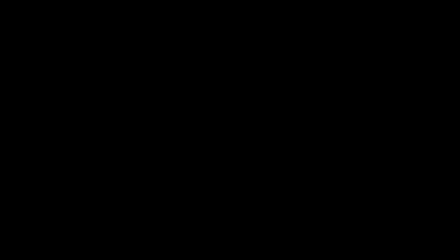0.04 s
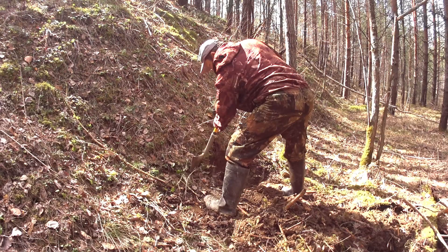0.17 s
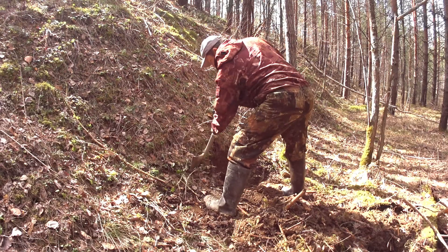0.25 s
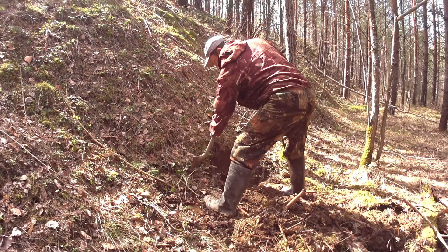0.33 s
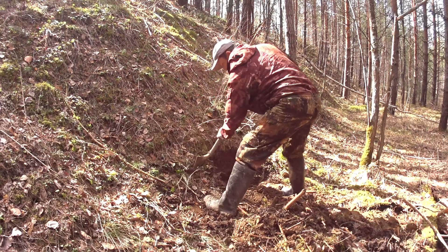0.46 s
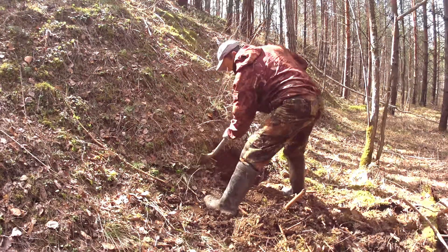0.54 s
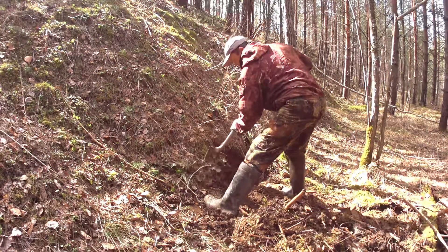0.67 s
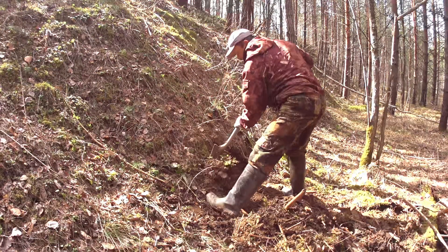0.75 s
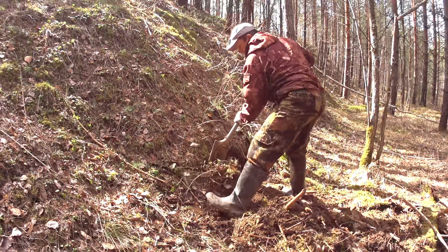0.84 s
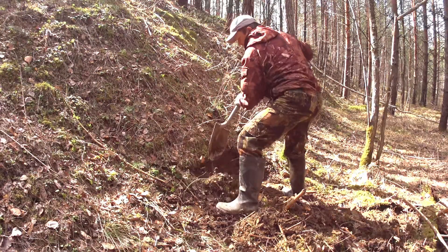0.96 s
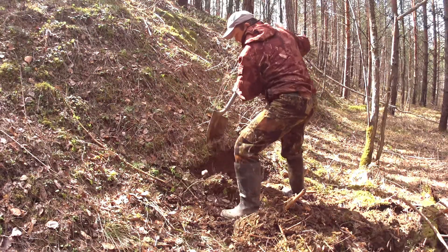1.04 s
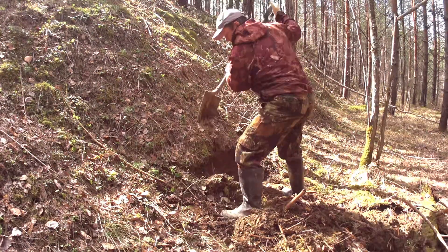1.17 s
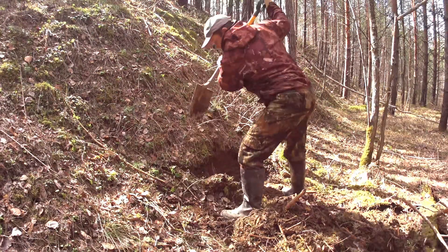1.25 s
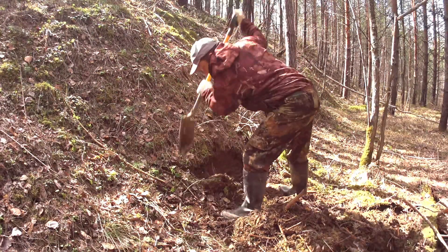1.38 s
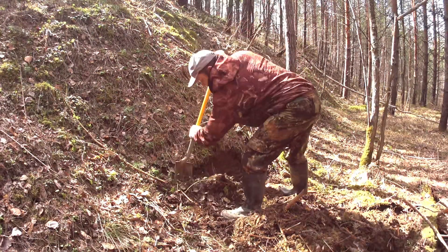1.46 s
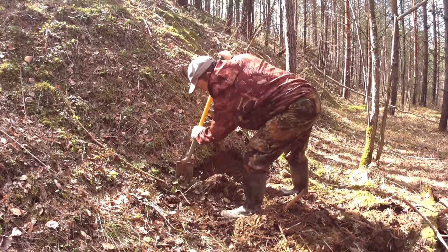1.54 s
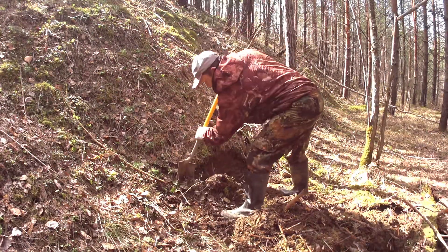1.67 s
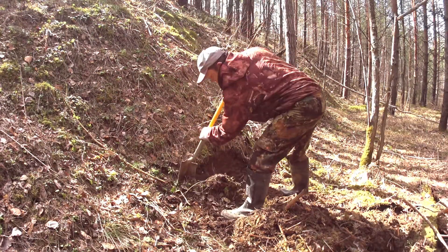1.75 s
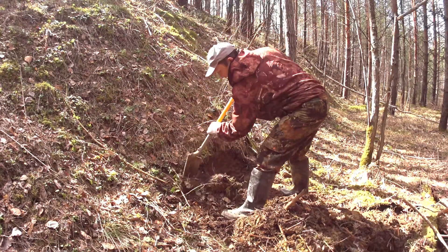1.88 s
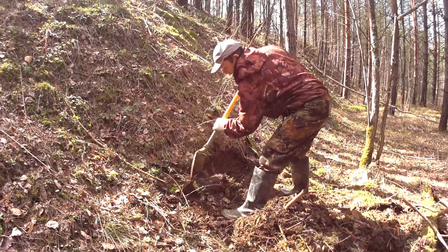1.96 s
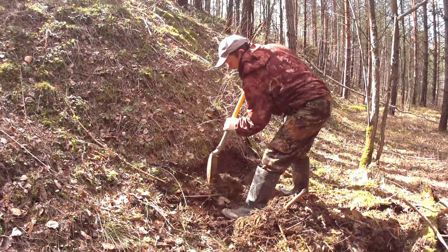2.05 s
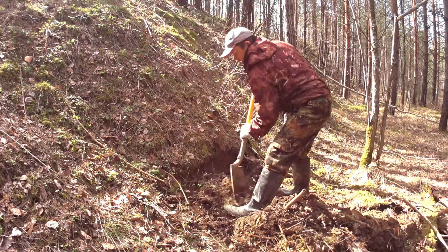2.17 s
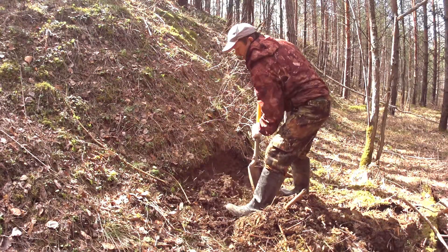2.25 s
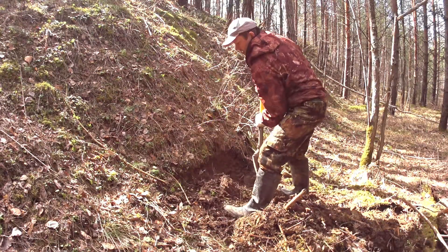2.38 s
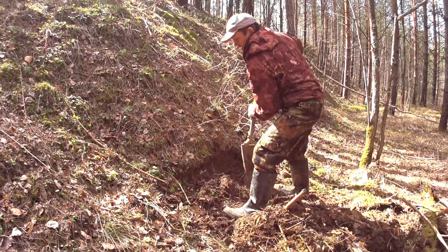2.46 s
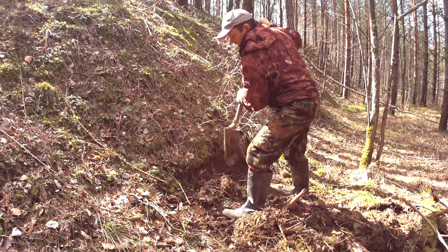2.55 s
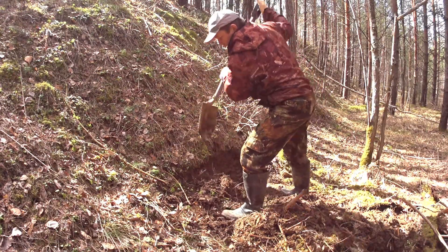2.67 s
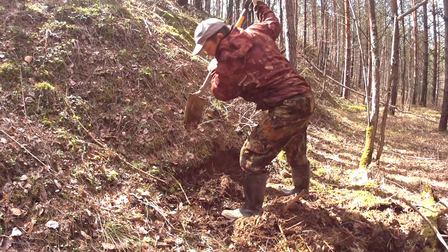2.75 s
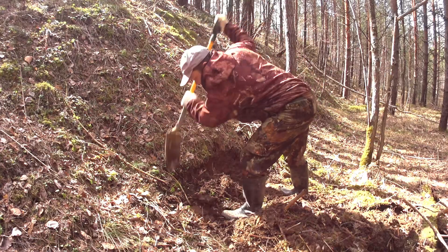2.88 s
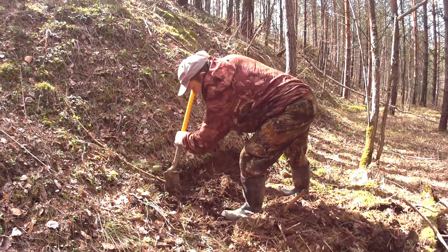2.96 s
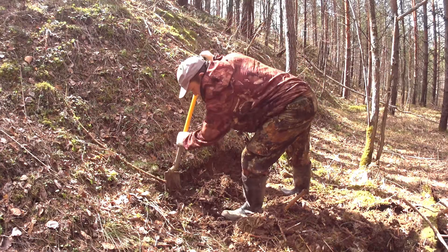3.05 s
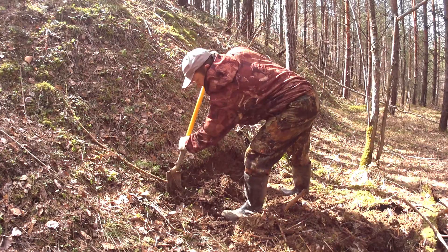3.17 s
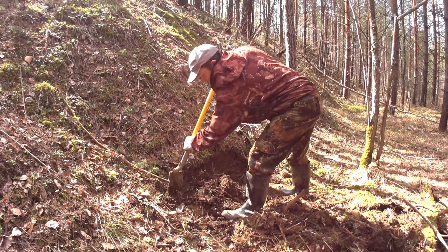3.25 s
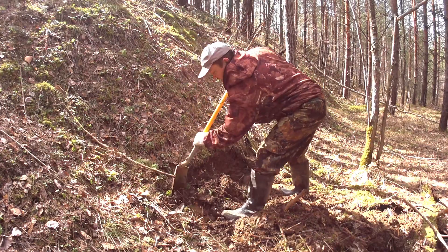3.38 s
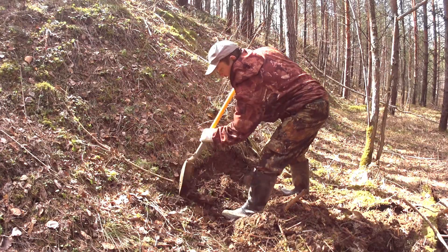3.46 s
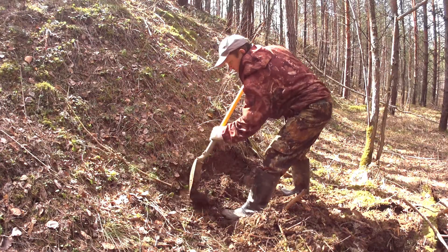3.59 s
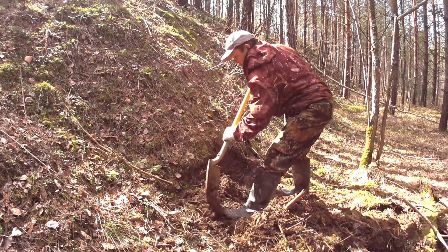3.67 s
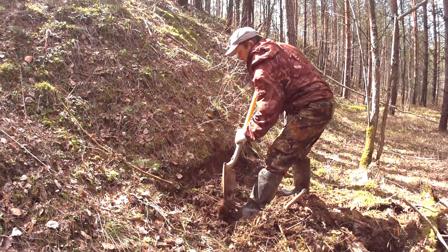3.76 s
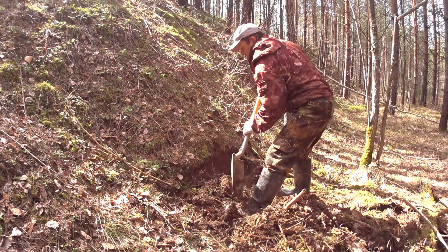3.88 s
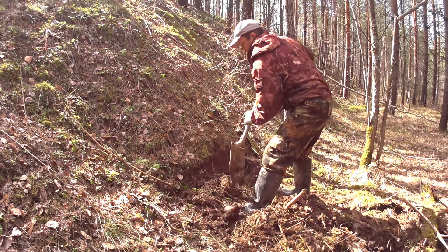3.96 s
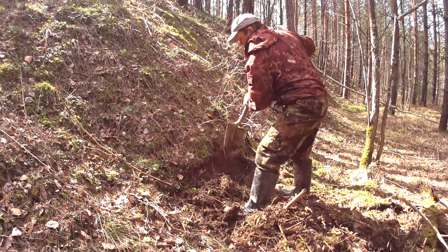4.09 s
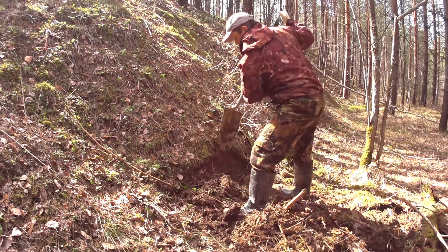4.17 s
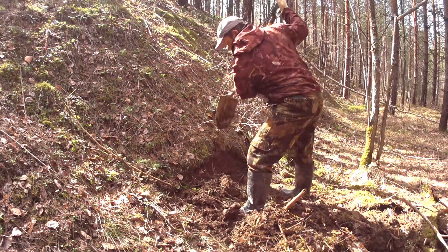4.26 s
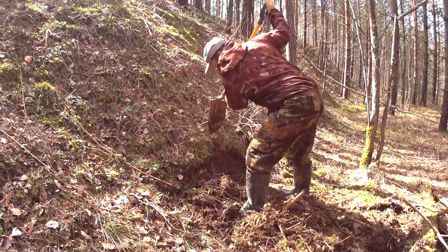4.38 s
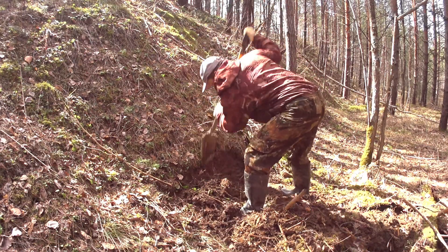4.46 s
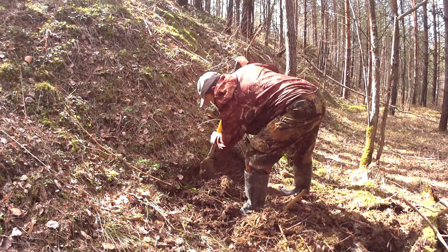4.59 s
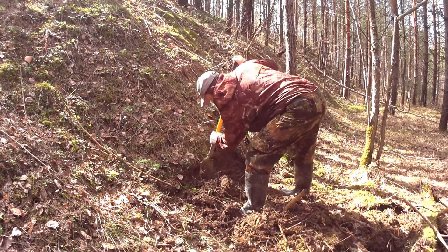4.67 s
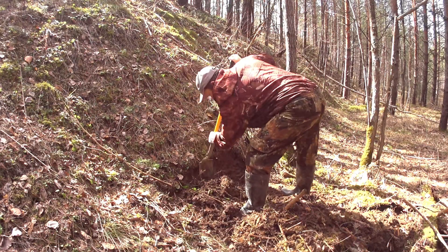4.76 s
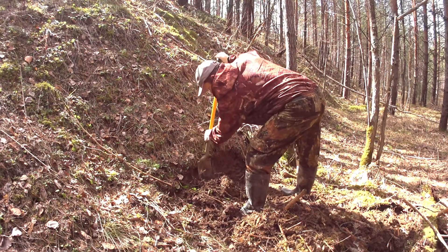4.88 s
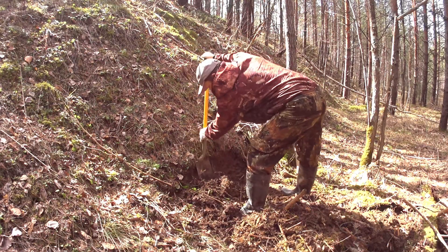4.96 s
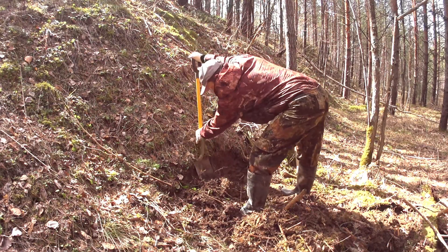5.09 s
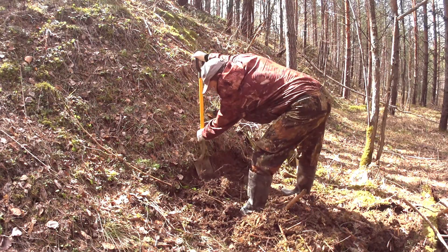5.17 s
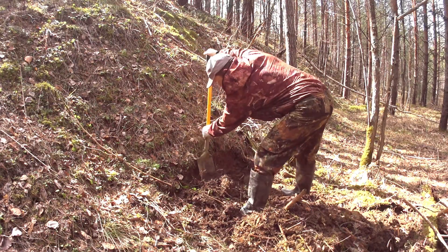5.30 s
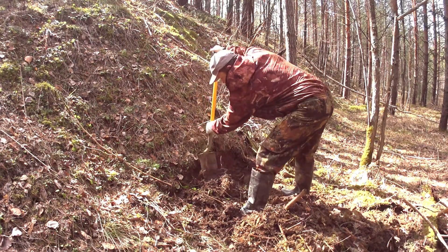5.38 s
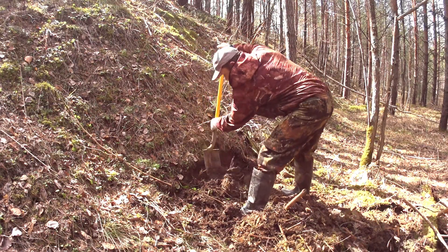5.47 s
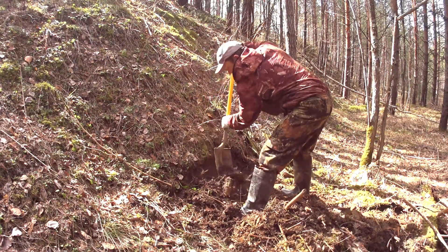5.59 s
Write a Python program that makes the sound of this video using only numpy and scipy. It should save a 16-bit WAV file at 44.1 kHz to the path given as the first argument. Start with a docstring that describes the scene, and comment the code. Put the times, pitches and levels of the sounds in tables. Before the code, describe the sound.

Three gritty, ringing spade chops into a clay bank, with earth sliding over dry leaves and a faint distant songbird late on.

```python
"""A pine forest: a steel spade with a wooden handle chops three times into a clay bank.
Each chop shears grit, packs clay and breaks roots in a few jolts; the blade rings, the handle knocks.
In between, loose soil slides and trickles over dry leaves, and twigs snap. The digger's jacket
swishes and flaps. Air rushes in the treetops; a distant songbird starts up near the end."""
import sys
import numpy as np
from scipy import signal
from scipy.fft import rfft, irfft
from scipy.io import wavfile

SR = 44100
rng = np.random.default_rng(int(sys.argv[2]) if len(sys.argv) > 2 else 0)


def master_out(mix):
    """Clip the mix to full scale and print it as 16-bit PCM to the path in sys.argv[1]."""
    frames = np.transpose(np.atleast_2d(mix))
    ceiling = np.clip(frames, -1, 1)
    pcm = np.round(ceiling * 32767).astype(np.int16)
    wavfile.write(sys.argv[1], SR, pcm)


N = 248283
TIME = np.arange(N) / SR
BRIEF = TIME[:8192]

# spade strokes: (contact [s], hardest cut [s], relative cutting level [dB], deepest point [s],
# relative packing level [dB], clank pitch [Hz], clank re packing [dB], thud re packing [dB])
CHOPS = [(1.389, 1.429, -24, 1.431, -29, 1440, -1.5, -7), (2.877, 2.91, -22, 2.912, -23, 863, -9, -10.5),
         (4.467, 4.477, -22, 4.487, -26.5, 1240, -3, -15)]


def from_db(db):
    return 10 ** (np.asarray(db) / 20)


def rms_one(x):
    return x / np.sqrt(np.mean(x ** 2) + 1e-20)


def drift(rate_hz):
    """Smooth random signal, rms 1."""
    knots = rng.standard_normal(4096)
    return rms_one(np.interp(TIME * rate_hz, np.arange(len(knots)), knots))


def colour(x, spectrum):
    """Unit-energy minimum-phase filter from (frequency [Hz], level [dB]) rows."""
    hz, db = np.transpose(spectrum)
    grid_hz = np.linspace(1, SR / 2, 1025)
    cepstrum = irfft(np.log(from_db(np.interp(np.log(grid_hz), np.log(hz), db))))
    cepstrum[1:1024] *= 2
    cepstrum[1025:] = 0
    response = irfft(np.exp(rfft(cepstrum)))
    return signal.fftconvolve(x, response / np.linalg.norm(response))[:len(x)]


def resonate(x, hz, width_hz):
    """Band resonance, peak gain 1."""
    q = hz / min(width_hz, SR / 4)
    return signal.lfilter(*signal.iirpeak(min(hz, SR / 3), q, fs=SR), x + 1e-18)


def low_cut(x, hz):
    return signal.sosfilt(signal.butter(4, hz, "high", fs=SR, output="sos"), x + 1e-18)


def ringing(modes):
    """Decaying sines after one blow."""
    t = TIME[:SR // 2]
    return sum(from_db(db - 60 * t / t60_s) * np.sin(2 * np.pi * hz * t) for hz, db, t60_s in modes)


def place(rows, sound):
    """One sound(*args) per (time [s], peak [dB], *args) row."""
    out = np.zeros(N)
    for time_s, db, *args in rows:
        at = int(time_s * SR)
        wave = sound(*args)[:N - at]
        out[at:at + len(wave)] += from_db(db) * wave / np.abs(wave).max()
    return out


def grains(per_s, spread_db):
    """Random micro-fractures of uneven size, rms 1."""
    sizes = from_db(spread_db * np.minimum(rng.exponential(1, N), 4)) * rng.choice([-1, 1], N)
    return rms_one(sizes * (rng.random(N) < per_s / SR) / np.sqrt(per_s))


def fracture(hz, width_ratio, splinter, decay_s):
    """One break and a fast-dying spray of splinters in a broad resonance."""
    force = splinter * rng.standard_normal(len(BRIEF)) * np.exp(-BRIEF / decay_s)
    force[0] += 1
    return resonate(force, hz, hz * width_ratio)


def scatter(x, t60_s, onset_s):
    """Dense reflections: two independent unit-energy tails."""
    t = TIME[:SR * 2]
    echoes = rng.standard_normal((2, len(t))) * from_db(-60 * t / t60_s) * (1 - np.exp(-t / onset_s))
    echoes /= np.linalg.norm(echoes, axis=1, keepdims=True)
    return signal.fftconvolve(x[None], echoes, axes=1)[:, :N]


def forest_air():
    """Soft, steady rush in the treetops."""
    # air spectrum: (frequency [Hz], level [dB])
    spectrum = [(25, -19), (60, -21.5), (130, -15), (220, -8), (400, 0.5), (600, 2.5), (1200, -3),
                (2600, -8), (4100, -16), (5600, -13.5), (11000, -20)]
    mid, side = [colour(rng.standard_normal(N), spectrum) for _ in range(2)]
    return from_db(-65.5) * (mid + from_db(0.5) * side * [[1], [-1]])


def bird():
    """A thin note, then a raspy syllable repeated ever louder, smeared by the trunks."""
    # held note: (start [s], length [s], start pitch [Hz], end pitch [Hz], relative level [dB])
    opening = (4.6, .15, 4080, 3950, -59)
    # syllable's notes: (delay [s], length [s], start pitch [Hz], end pitch [Hz], relative level [dB])
    syllable = [(0, .08, 4750, 4100, -9), (.03, .11, 3900, 3600, 0)]
    first_s, period_s, step_db = 4.722, .194, 1.17
    opening_rasp, syllable_rasp = .025, .066   # rms flutter / pitch
    notes = [(*opening, opening_rasp)]
    for k in range(5):
        for delay_s, *glide, db in syllable:
            start_s = first_s + k * period_s + delay_s
            notes.append((start_s, *glide, db - 48.5 + k * step_db, syllable_rasp))
    song, flutter = np.zeros(N), drift(600)
    for start_s, length_s, start_hz, end_hz, db, rasp in notes:
        along = np.clip((TIME - start_s) / length_s, 0, 1)
        hz = (start_hz + (end_hz - start_hz) * along) * (1 + rasp * flutter)
        envelope = from_db(db) * np.sqrt(4 * along * (1 - along))
        song += envelope * np.sin(2 * np.pi * np.cumsum(hz) / SR)
    mid, side = from_db(2) * scatter(song, t60_s=0.87, onset_s=0.00048)
    return mid + from_db(-18) * side * [[1], [-1]]


def digger():
    """Cloth rubs on cloth; soft contacts give a few damped cycles."""
    # jacket swishes: (centre [s], Gaussian sigma [s], level [dB])
    swishes = [(0.522, 0.069, -53.5), (3.898, 0.054, -50)]
    # cloth friction spectrum: (frequency [Hz], level [dB])
    cloth = [(500, -26), (1500, -18), (2500, -2.5), (3700, -6), (4800, 3.5), (6100, -8.5), (7200, -21.5),
             (11000, -34)]
    # cloth and boot bumps: (time [s], peak [dB], pitch [Hz])
    thumps = [(.347, -46, 191), (1.371, -48, 228), (2.705, -48, 212), (2.918, -43.5, 214),
              (4.394, -46.5, 218)]
    swing = sum(from_db(db) * np.exp(-((TIME - s) / sigma_s) ** 2 / 2) for s, sigma_s, db in swishes)
    pulse = BRIEF * np.exp(-BRIEF / .003)
    bumps = place(thumps, lambda hz: resonate(pulse * np.sin(2 * np.pi * hz * BRIEF), hz * 2, hz * 1.1))
    return swing * colour(rng.standard_normal(N), cloth) + bumps


def surge(peak_s, db, rise_s, fall_s):
    """Gain of one slide: sharp crest, long skirts, 22.5 dB down at rise_s before and fall_s after."""
    away = np.maximum((peak_s - TIME) / rise_s, (TIME - peak_s) / fall_s)
    return from_db(db - 22.5 * away ** 0.9)


def sliding():
    """Leaf and earth gains, set by the strongest slide; each chop also stirs some soil."""
    # soil pushed by blade or boot: (crest [s], leaf gain [dB], earth gain [dB], rise [s], fall [s])
    slides = [(.14, -68, -70, 0.26, 1.0), (.665, -52, -54, 0.31, 0.41), (.99, -61, -60, 0.44, 0.36),
              (2.015, -50, -52, 0.28, .33), (3.3, -61, -62, 0.8, 1), (3.57, -60, -55.5, 0.75, 0.29),
              (3.87, -63, -53, 0.56, 0.15), (4.97, -68.5, -62.5, 0.27, 0.48), (5.52, -66, -58, 0.63, 0.55)]
    slides = list(slides) + [(cut_s, -67, -64.5, 0.45, 0.84) for _, cut_s, *_ in CHOPS]
    inertia = 1.36   # heavy earth starts and stops more slowly
    leaf_gains = [surge(s, db, rise_s, fall_s) for s, db, _, rise_s, fall_s in slides]
    earth_gains = [surge(s, db, rise_s * inertia, fall_s * inertia) for s, _, db, rise_s, fall_s in slides]
    trickle_floor = from_db(-78.5)
    return np.maximum(np.max(leaf_gains, axis=0), trickle_floor), np.max(earth_gains, axis=0)


def crumbs(leaf_gain):
    """Small random breaks, louder as the slide grows."""
    per_s, centre_hz, spread_oct, spread_db = 20, 5800, 0.55, 2.5
    at = np.flatnonzero(rng.random(N) < per_s / SR)
    size, pitch = rng.standard_normal((N, 2))[at].T
    peak_db = 20 * np.log10(leaf_gain[at]) + 21 + spread_db * size
    breaks = zip(TIME[at], peak_db, centre_hz * 2 ** (spread_oct * pitch))
    return place(breaks, lambda hz: resonate(fracture(hz, 0.7, splinter=0.14, decay_s=0.0014), hz, hz))


def clods():
    """Clods and soles land on loose earth."""
    # landings: (time [s], peak [dB], centre [Hz])
    landings = [(.348, -53, 705), (2.033, -46.5, 970), (2.706, -46, 606), (3.684, -37.5, 485),
                (3.729, -38.5, 550), (3.825, -42, 442)]
    hits = place(landings, lambda hz: resonate(fracture(hz, 0.55, splinter=1, decay_s=0.012), hz, hz * 3))
    return low_cut(hits, 150)


def twigs():
    """Twigs snap and splinter."""
    # snaps: (time [s], peak [dB], centre [Hz])
    snaps = [(.6495, -26.5, 4060), (.6605, -35, 3870), (.694, -36, 3800), (1.1835, -36, 1770),
             (1.227, -37.5, 5200), (1.277, -40, 4100), (1.6385, -39, 3500), (2.022, -26.5, 4120),
             (2.3745, -41.5, 2090), (2.805, -31.5, 2960), (2.986, -29, 3000), (3.125, -33.5, 6460),
             (3.179, -34, 6940), (3.198, -37.5, 4060), (3.2633, -36.5, 4000), (3.324, -38, 7000),
             (3.3775, -28.5, 2780), (3.583, -32.5, 3800), (3.661, -35, 1600), (3.7294, -36.5, 5600),
             (4.018, -43, 4750), (4.276, -42, 7000), (4.424, -42, 4540), (4.6235, -36.5, 4730)]
    # twig spectrum: (frequency [Hz], level [dB])
    spectrum = [(300, -3.5), (1500, 5.5), (2700, -2), (4000, 6), (5800, -8.5), (11000, -11)]
    return place(snaps, lambda hz: colour(fracture(hz, 0.47, splinter=0.22, decay_s=0.0028), spectrum))


def loose_soil():
    """Soil runs over dry leaves: the faster the slide, the denser the crackle."""
    # dry leaf spectrum: (frequency [Hz], level [dB])
    crackle = [(400, -33), (1400, -10), (2700, -13), (3400, -4.5), (3950, 0), (4600, -4), (5600, -15),
               (7700, -15), (11000, -23)]
    # sliding earth spectrum: (frequency [Hz], level [dB])
    rustle = [(80, -34.5), (180, -16.5), (350, -4), (600, -2.5), (950, -0.5), (1420, -3.5), (2200, -3),
              (3200, 3), (8000, -46)]
    leaf_gain, earth_gain = sliding()
    per_s = 900 + 6000 * leaf_gain / leaf_gain.max()
    leaves = leaf_gain * colour(grains(per_s, spread_db=1.5), crackle) * from_db(11 + 1.77 * drift(90))
    earth = from_db(-1.5) * earth_gain * colour(grains(2000, spread_db=6.5), rustle)
    return leaves + earth + clods() + twigs() + crumbs(leaf_gain)


def handle():
    """Wood knocks in the steel socket and squeaks briefly."""
    # handle modes: (frequency [Hz], level [dB], t60 [s])
    modes = [(836, -10.5, 0.041), (1226, -4.5, 0.034), (1350, -7, 0.025), (1907, -2.5, 0.027)]
    # socket knocks: (time [s], peak [dB])
    knocks = [(4.4817, -11.5), (4.5135, -30), (4.7168, -36), (5.4115, -38.5)]
    # handle squeaks: (time [s], peak [dB], pitch [Hz])
    squeaks = [(1.184, -45, 1750), (1.548, -41, 2120)]

    def squeak(hz):
        rub = BRIEF * np.exp(-BRIEF / .003) * rng.standard_normal(len(BRIEF))
        return resonate(resonate(rub, hz, 150), hz, 600)

    return place(knocks, lambda: resonate(ringing(modes), 1180, 610)) + place(squeaks, squeak)


def buried_spade(force):
    """Spade resonances, heavily damped by clay."""
    # buried modes: (frequency [Hz], bandwidth [Hz], gain [dB])
    modes = [(395, 140, -9.5), (545, 24, -5), (630.5, 8.1, -3.5), (990, 45, -1), (1134, 59, -7.5),
             (1292, 38, 3.5), (1535, 15, -1), (1875, 163, 0), (2210, 23, -1), (2652, 79, 0),
             (3790, 42, -0.5), (3900, 89, -6)]
    return sum((-1) ** k * from_db(db) * resonate(force, hz, width_hz)
               for k, (hz, width_hz, db) in enumerate(modes))


def thrust(contact_s, peak_s, db, rise_db_per_s, fall_db_per_s):
    """Force builds with depth, collapses as the blade stalls, and tails off as the cut settles."""
    rise_db = db - rise_db_per_s * np.maximum(peak_s - TIME, 0)
    after_s = np.maximum(TIME - peak_s, 0)
    stall_db = -fall_db_per_s * after_s
    settle_db = -20.5 - 263 * after_s
    return (TIME >= contact_s) * from_db(rise_db + np.maximum(stall_db, settle_db))


def cutting():
    """The edge shears through grit."""
    # grit-on-steel spectrum: (frequency [Hz], level [dB])
    spectrum = [(30, -81), (120, -35), (350, -30.5), (1500, -5), (2400, -16), (3200, 1.5), (3850, 7),
                (4400, 4), (5200, -7), (5900, -10.5), (7500, -8.5), (11000, -19)]
    force = sum(thrust(contact_s, cut_s, db, rise_db_per_s=500, fall_db_per_s=952)
                for contact_s, cut_s, db, *_ in CHOPS)
    return from_db(0.5) * force * colour(grains(7700, spread_db=3.5), spectrum)


def packing():
    """The blade packs the clay: the bank takes the load, the clay thuds, the wedged steel clanks."""
    push = grains(5000, spread_db=0.5)

    def note(hz, width_hz):
        return rms_one(resonate(resonate(push, hz, width_hz), hz, hz))

    spade = from_db(-1) * rms_one(low_cut(buried_spade(push), 255))
    ground = from_db(-35) * rms_one(resonate(push, 103, 70))
    out = np.zeros(N)
    for contact_s, _, _, deepest_s, db, clank_hz, clank_db, thud_db in CHOPS:
        force = thrust(contact_s, deepest_s, db, rise_db_per_s=585, fall_db_per_s=1097)
        clank = from_db(clank_db) * note(clank_hz, 0.18 * clank_hz)
        thud = from_db(thud_db) * note(443, 220)
        out += force * (spade + ground + clank + thud)
    return out


def blade_ring():
    """The steel rings from each hardest cut; chattering soil flutters the level."""
    # free blade modes: (frequency [Hz], level [dB], t60 [s])
    modes = [(1992, -19, .35), (3895, -13, .45), (4118, -17, .45), (4250, -18, .5), (4488, -1, .34),
             (4522, -7, .4), (4555, -11, .3), (4760, -21, .28), (7854, -28, .2)]
    blows = [(cut_s, db - 10) for _, cut_s, db, *_ in CHOPS]
    chatter_db = 2.6 * drift(160)
    return place(blows, lambda: ringing(modes)) * from_db(chatter_db)


def roots():
    """Roots and stones give way under the edge; each crack rings the buried spade."""
    # jolts: (time [s], peak [dB], centre [Hz])
    jolts = [(1.4104, -19, 4000), (1.4198, -12.5, 4400), (1.4203, -24.5, 416), (1.4210, -20, 2650),
             (1.4330, -14, 4187), (2.8772, -20.5, 2980), (2.8957, -8, 6200), (2.9058, -6.5, 2620),
             (2.9064, -15, 610), (2.9107, -8.5, 1090), (2.9180, -11, 3670), (4.4700, -4.5, 6040),
             (4.4795, -14.5, 3700)]
    # breaking root spectrum: (frequency [Hz], level [dB])
    spectrum = [(200, -31), (360, -17), (750, -10), (1400, -5.5), (4300, 6.5), (5200, 5), (5900, -11),
                (7500, -2.5), (11000, -3)]

    def jolt(hz):
        crack = resonate(fracture(hz, 0.53, splinter=0.33, decay_s=0.00035), hz, hz * 2.8)
        return colour(crack + from_db(3) * buried_spade(crack), spectrum)

    return place(jolts, jolt)


def scene():
    """Digging heard directly, off the near bank and faintly off the trees; bird and air behind."""
    # tree echo spectrum: (frequency [Hz], level [dB])
    bark = [(100, -11), (1200, -7), (4500, -10), (7000, -6), (11000, -6.5)]
    chops = cutting() + packing() + blade_ring() + roots()
    work = chops + handle() + loose_soil() + digger()
    bank = from_db(-12) * scatter(work, t60_s=0.028, onset_s=0.0026)
    trees = from_db(-29.5) * scatter(colour(work, bark), t60_s=0.6, onset_s=0.0069)
    return work + bank + trees + bird() + forest_air()


def record(dry):
    """The level dips briefly near the start; steep low-pass at 11.1 kHz."""
    dip = np.interp(TIME, [.075, .085, .106, .111], [1, .02, .02, 1])
    return signal.sosfilt(signal.cheby1(16, .3, 11100, fs=SR, output="sos"), dry * dip)


dry = scene()
out = record(dry)
master_out(out)
```